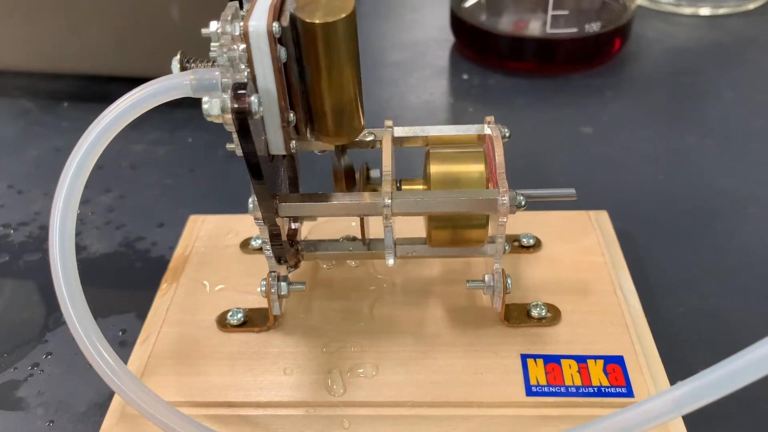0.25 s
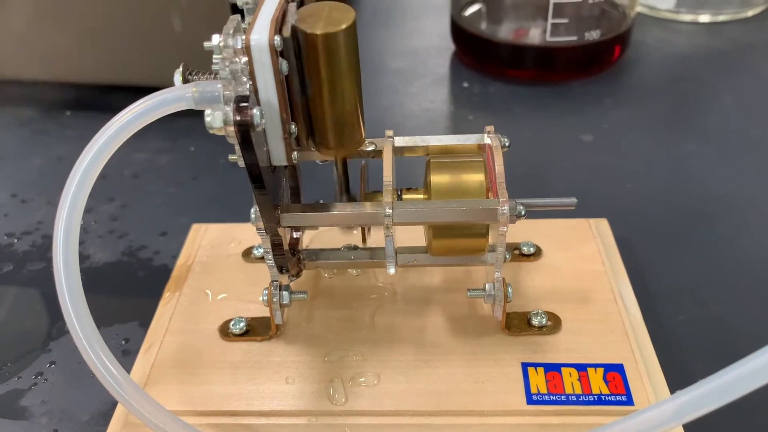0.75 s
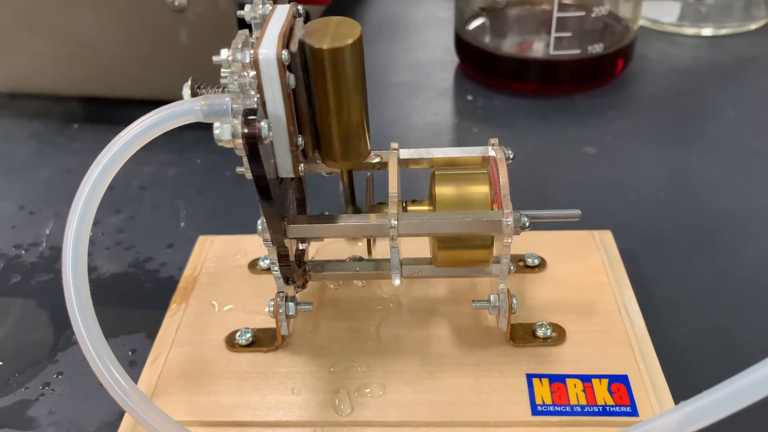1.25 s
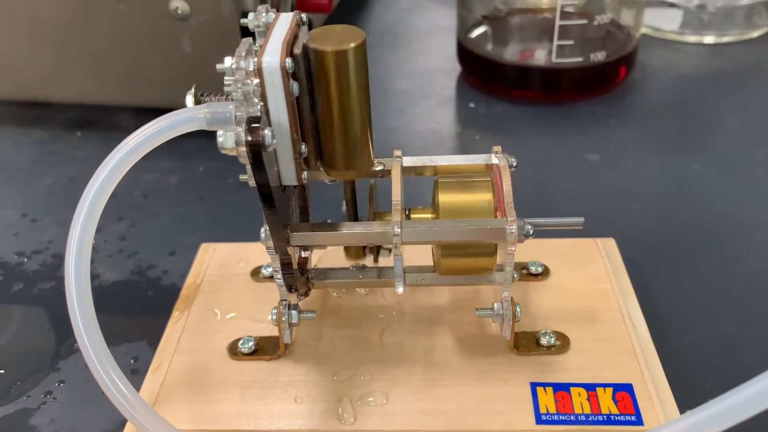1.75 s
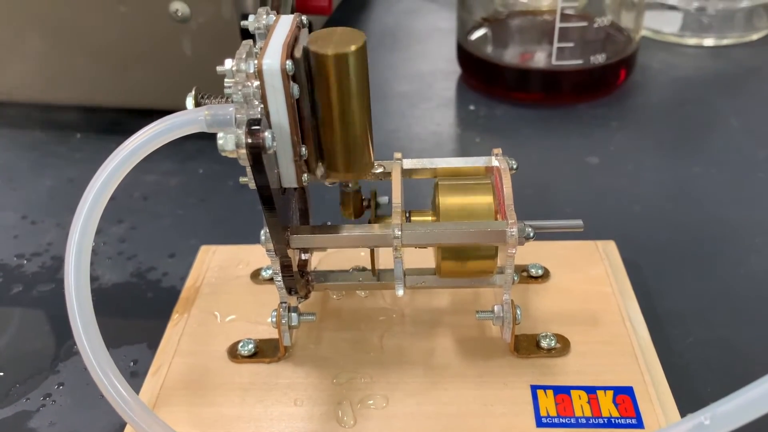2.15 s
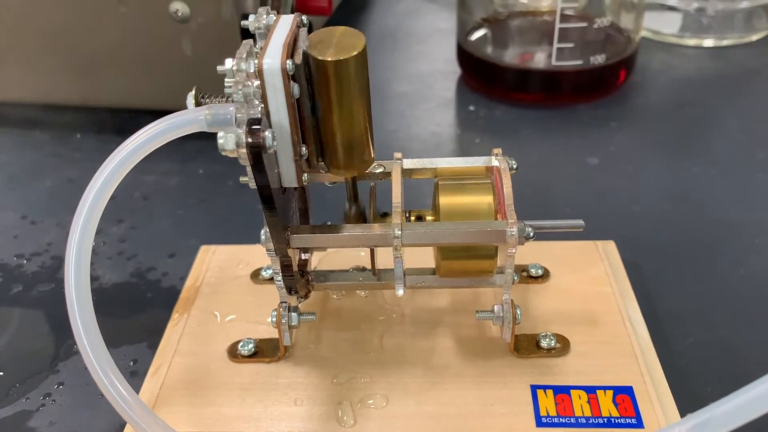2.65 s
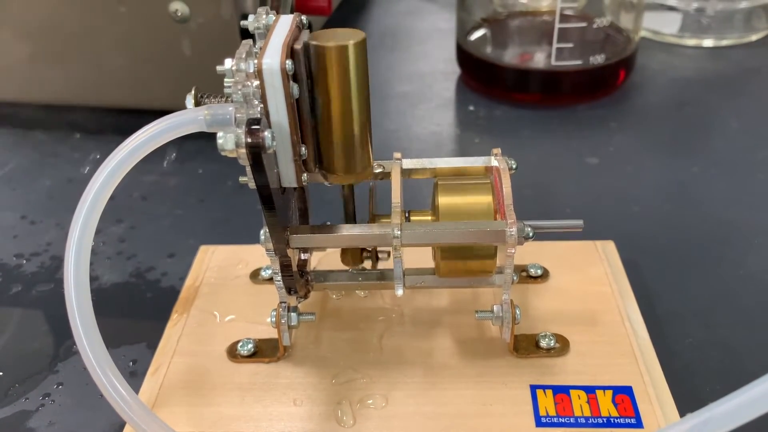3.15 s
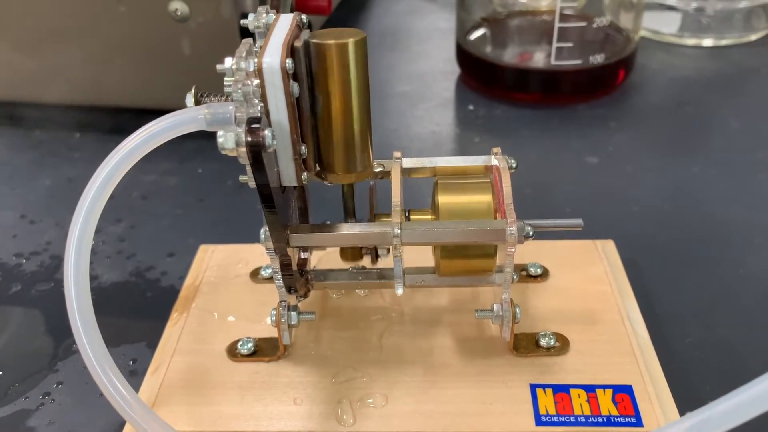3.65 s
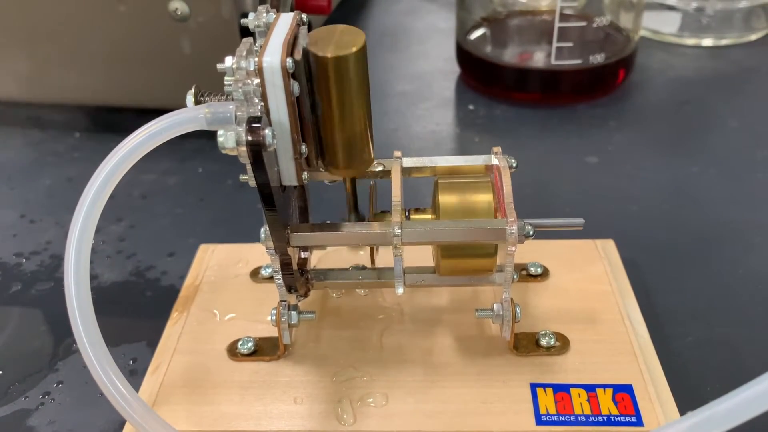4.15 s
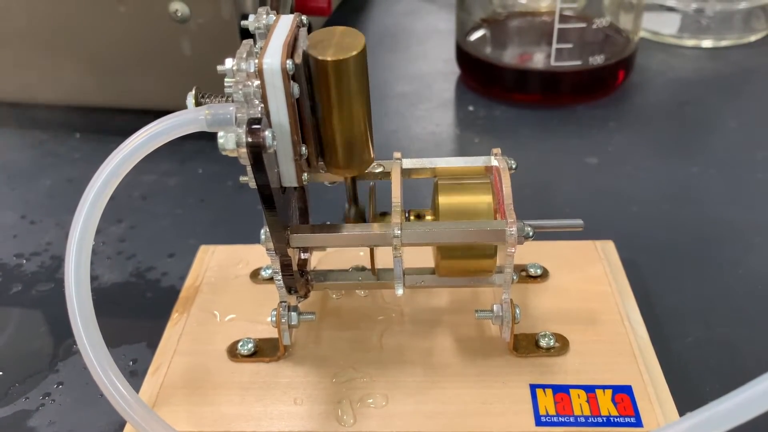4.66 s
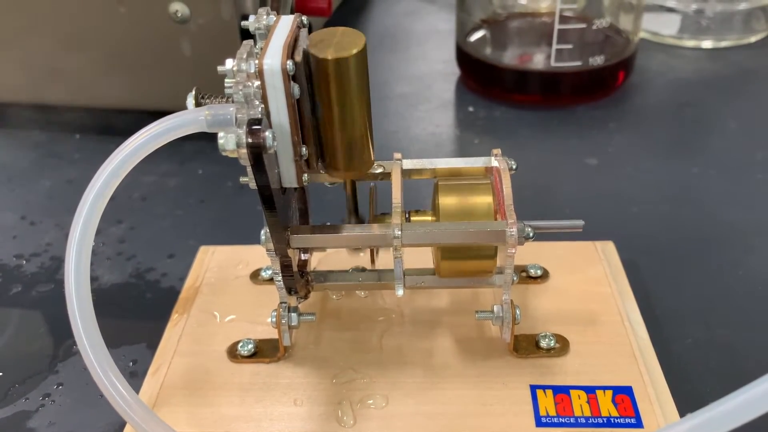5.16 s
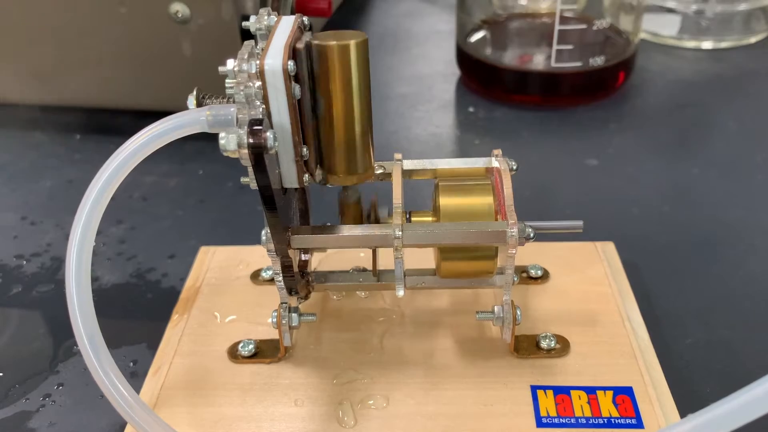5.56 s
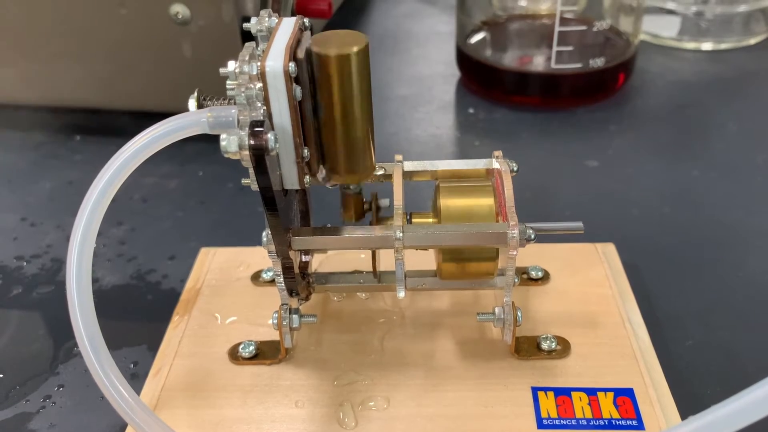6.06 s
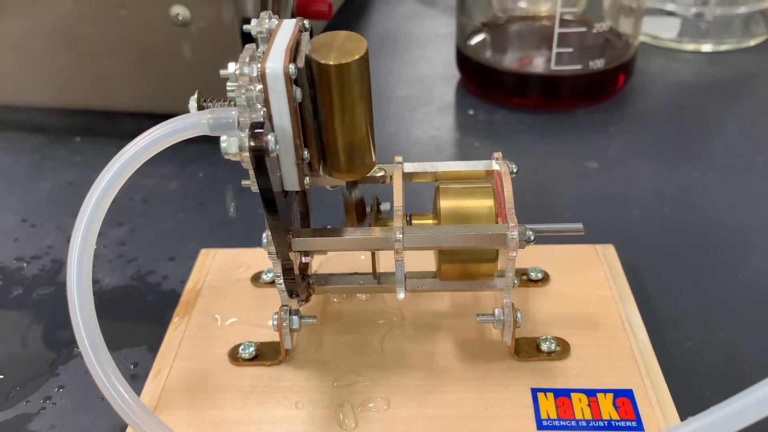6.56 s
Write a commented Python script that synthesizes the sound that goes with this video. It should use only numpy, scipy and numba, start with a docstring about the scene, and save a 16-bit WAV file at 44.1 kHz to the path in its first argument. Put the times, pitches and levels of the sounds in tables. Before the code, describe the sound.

Fast, even ticking and hollow clatter come from a miniature steam engine on a wooden board, heard up close in a small, hard-walled room. Short puffs of wet steam hiss and crackle with every stroke. The pace sags and recovers slightly, and the knocks grow harder and softer in spells. Behind it, a boiling flask settles to a quiet simmer within the first seconds.

```python
"""Small brass steam engine on a bench

The engine runs close by at about six turns a second. Twice a turn the crank hits the end of its slack:
a metal tick and a knock that rings the wooden board under it. The cylinder then rocks over, the piston
rubs, and wet steam hisses and spits from the port, its outlet. A flask boils behind, in a small hard room."""
import sys
import numpy as np
from scipy import signal
from scipy.fft import rfft, irfft
from scipy.io import wavfile
from numba import njit

SR = 44100
rng = np.random.default_rng(int(sys.argv[2]) if len(sys.argv) > 2 else 0)


def inscribe(sig):
    """Save sig as 16-bit PCM at rate SR to the path in sys.argv[1].

    A 1-D sig is mono; a 2-D sig holds one channel per row.
    Samples are clipped to [-1, 1] before scaling.
    """
    pcm = np.round(np.clip(np.atleast_2d(sig).T, -1, 1) * 32767)
    wavfile.write(sys.argv[1], SR, pcm.astype(np.int16))


N = 300762
TIME = np.arange(N) / SR
OUT, BACK = 0, 1  # the piston's two directions; paired stroke settings come in this order


def undb(db):
    """Turn decibels into a gain to multiply by."""
    return 10 ** (np.asarray(db) / 20)


def unit(response):
    """Scale a response to an energy of 1 per channel."""
    return response / np.sqrt(np.mean(np.sum(response ** 2, axis=-1)))


def curve(points, times=TIME):
    """Join a table's (time, value) points with straight lines."""
    return np.interp(times, *np.transpose(points))


def fade(t, t60):
    """Die away by 60 dB in t60 seconds."""
    return np.exp(-np.log(1000) * t / t60)


def through(x, response):
    """Let every sample of a sound set off a response, such as a ring or an echo."""
    return signal.fftconvolve(np.atleast_2d(x), np.atleast_2d(response), axes=1)[:, :N]


def filtered(x, order, hz, kind="lowpass"):
    """Keep the lows, the highs or a band; a higher order cuts more steeply."""
    return signal.lfilter(*signal.butter(order, hz, kind, fs=SR), x)


def colour(points, size=1024):
    """A short response with the tone colour of (frequency, level) points, fading below the first."""
    hz, db = np.transpose(points)
    bins_hz = np.fft.rfftfreq(size, 1 / SR)
    gain = undb(np.interp(np.log(bins_hz + 1), np.log(hz), db))
    gain *= np.minimum(bins_hz / hz[0] + 1e-2, 1) ** 2
    # move the energy to the start, so that clicks stay sharp
    cepstrum = irfft(np.log(gain))
    cepstrum[1:size // 2] *= 2
    cepstrum[size // 2 + 1:] = 0
    return unit(irfft(np.exp(rfft(cepstrum))))


@njit
def resonate(x, hz, width):
    """Ring at a pitch that can move; a smaller width (in Hz) rings longer."""
    y, state, decay = np.empty(len(x)), 0j, np.exp(-np.pi * width / SR)
    for i in range(len(x)):
        state = state * decay * np.exp(2j * np.pi * hz[i] / SR) + x[i]
        y[i] = state.imag
    return y * np.sqrt(2 * (1 - decay * decay))


def wander(per_s):
    """Drift to a new random value per_s times a second, with a spread of 1."""
    steps = rng.standard_normal(N)[:int(N / SR * per_s) + 2]
    x = np.interp(TIME * per_s, np.arange(len(steps)), steps)
    return x / x.std()


def grainy(per_s, grain_db):
    """Noise that comes in uneven grains; more grain_db makes it rougher."""
    x = rng.standard_normal(N) * undb(grain_db * np.minimum(wander(per_s), 2))
    return x / x.std()


def blows(times, db):
    """One sharp spike for each blow."""
    return np.bincount(np.clip(times * SR, 0, N - 1).astype(int), undb(db), N)


def swells(times, db, shape):
    """A loudness curve that repeats one shape at each of the times."""
    first_s, last_s = shape[0][0], shape[-1][0]
    swell = undb(curve(shape, np.arange(first_s, last_s, 1 / SR)))
    return through(blows(times + first_s, db), swell)[0]


def on_right(x, lag_s=.000298):
    """A sound on the right reaches the left ear a little later."""
    x = np.ravel(x)
    return np.array([np.pad(x, (int(lag_s * SR), 0))[:N], x])


def on_left(x):
    """A sound on the left reaches the right ear a little later."""
    return on_right(x)[::-1]


def room(dry, t60_s=0.13, echo_db=-13, dull_hz=3500, gap_s=0.01055):
    """Glassware and walls send back a short, duller wash of echoes."""
    t = TIME[:SR // 2]
    tail = rng.standard_normal((2, len(t))) * fade(t, t60_s) * (t > gap_s)
    return undb(echo_db) * through(dry, filtered(unit(tail), 1, dull_hz))


def near_echoes(x, echo_db=2.0, band_hz=(2000, 5600)):
    """Add the quick, bright echoes off frame, board and bench, different for each ear."""
    t = TIME[:SR // 30]
    echoes = unit(rng.standard_normal((2, len(t))) * fade(t, t60=.025))
    return x + undb(echo_db) * filtered(through(x, echoes), 2, band_hz, "bandpass")


# tone colour of the boiling water: (frequency [Hz], relative level [dB])
BOIL_COLOUR = [(90, 3.5), (300, 4), (1500, -7.5), (2200, -16.5), (3900, -10.5), (6000, -19), (8500, -36.5),
               (11700, -22), (13000, -15), (14600, -38)]
# how loudly it boils: (time [s], level [dB])
BOIL_LEVEL = [(0, -43), (.6, -47.5), (1.3, -52.5), (2.8, -55), (4.5, -55.5), (6.82, -53.5)]


def flask(width=0.67, centred_below_hz=50):
    """Water simmers behind the engine and settles in the first seconds."""
    middle, spread = (through(grainy(90, 4.7), colour(BOIL_COLOUR))[0] for _ in range(2))
    spread = width * filtered(spread, 1, centred_below_hz, "highpass")
    return np.array([middle + spread, middle - spread]) * undb(curve(BOIL_LEVEL))


# the leak comes and goes: (time [s], level [dB])
LEAK_LEVEL = [(3.9, -90), (4.15, -68), (4.9, -64), (5.15, -90)]
# its tone colour: (frequency [Hz], relative level [dB])
LEAK_COLOUR = [(5900, -12), (6500, -2), (8500, -14), (10500, -2), (11400, 3), (12500, -1), (15500, -3)]


def leak():
    """The valve leaks for a while with a thin, fluttering sizzle."""
    sizzle = grainy(70, 4) * undb(curve(LEAK_LEVEL))
    return on_right(through(sizzle, colour(LEAK_COLOUR)))


# tone colour of fine spray: (frequency [Hz], relative level [dB])
SPRAY_COLOUR = [(4400, -3), (6300, -5.5), (8000, 12), (9300, 14), (11000, -6), (14000, -5), (16000, -36)]
# puffs of spray: (time [s], level [dB])
SPRAYS = [(3.199, -43.5), (4.72, -54)]
# rise and fall of one puff: (time since its start [s], relative level [dB])
SPRAY_SHAPE = [(0, -3), (.005, -1.5), (.03, -0.5), (.045, -33)]


def spray(drops_per_s=5, drop_db=-36, spread_db=3, drop_t60_s=0.0057):
    """Droplets tick at random at the port, and now and then the steam blows out a spray."""
    when, size = rng.random((int(drops_per_s * N / SR), 2)).T
    drops_db = drop_db + spread_db * np.minimum(-np.log(size), 3)
    drops = through(blows(when * N / SR, drops_db), unit(fade(TIME[:SR // 30], drop_t60_s)))[0]
    mist = swells(*np.transpose(SPRAYS), SPRAY_SHAPE)
    return on_right(through((drops + mist) * grainy(630, 5.6), colour(SPRAY_COLOUR)))


# chirps of the piston: (time [s], middle pitch [Hz], level [dB])
CHIRPS = [(0.835, 3190.0, -48), (1.005, 4360, -51), (1.171, 3060, -52), (1.502, 3090, -46),
          (1.985, 3330, -49), (2.6, 3060, -52), (3.206, 4440, -38), (4.212, 3510.0, -58),
          (4.553, 3200, -46), (4.72, 3170, -53), (5.94, 4440, -41)]


def chirps(gain_db=-2, length_s=.016, rise_hz_per_s=14000, rough_hz=110):
    """The wet piston gives short, rough chirps that slide upwards."""
    t = np.arange(-length_s / 2, length_s / 2, 1 / SR)
    arch = np.sqrt(2) * np.cos(np.pi * t / length_s)
    sound, wobble_hz = np.zeros(N), rough_hz * wander(500)
    for middle_s, hz, db in CHIRPS:
        span = int((middle_s + t[0]) * SR) + np.arange(len(t))
        phase = 2 * np.pi * np.cumsum(hz + rise_hz_per_s * t + wobble_hz[span]) / SR
        sound[span] += undb(db + gain_db) * arch * np.sin(phase)
    return on_left(sound)


# notes of the wet exhaust passage: (pitch [Hz], width [Hz], relative level [dB])
PASSAGE_NOTES = [(2268, 48, -1.5), (2650, 1670, 10.5), (3220, 280, -12), (3484, 330, 2.5),
                 (4345, 120, -1.5)]


def passage(top_hz=4700):
    """The exhaust passage rings briefly and lets little treble through."""
    hz, width, db = np.transpose(PASSAGE_NOTES)[:, :, None]
    t = TIME[:SR // 40]
    notes = undb(db) * np.sqrt(width) * np.exp(-np.pi * width * t) * np.sin(2 * np.pi * hz * t)
    return unit(signal.sosfilt(signal.butter(6, top_hz, fs=SR, output="sos"), notes.sum(axis=0)))


# one sputter, a list for out and one for back: (time after the tick [s], relative level [dB])
SPUTTER_SHAPES = ([(.018, 9.5), (.028, 10), (.045, 8), (.068, -25)], [(.003, 11.5), (.02, 9), (.04, 0),
                  (.065, -35)])


def sputter(side, times, sputter_db, gain_db=-10, mist_db=-11, bursts_per_s=130, burst_db=3.5):
    """Condensed water crackles in the exhaust in uneven bursts and leaves the port as a fine mist."""
    crackle = grainy(500, 3.4) * swells(times, sputter_db + gain_db, SPUTTER_SHAPES[side])
    crackle *= undb(burst_db * wander(bursts_per_s))
    mist = undb(mist_db) * through(crackle, colour(SPRAY_COLOUR))
    return on_left(through(crackle, passage())) + on_right(mist)


# notes of the steam space: (start pitch [Hz], end pitch [Hz], width [Hz], relative level [dB])
SQUELCH_NOTES = [(2900, 3600, 170, -14), (4050, 4520, 100, -4.5)]
# rise and fall of one squelch: (time after the tick [s], relative level [dB])
SQUELCH_SHAPE = [(.02, -14), (.03, -2), (.044, 1.5), (.054, -7), (.064, -30)]


def squelch(times, sputter_db, start_s=0.02, slide_s=0.026, floor_db=-57, spread_db=2.5):
    """The steam space shrinks on the out stroke: its notes, rung by crackling water, slide up."""
    length_luck, pitch_luck, level_luck = rng.standard_normal((len(times), 3)).T
    stroke = np.maximum(np.searchsorted(times, TIME) - 1, 0)  # the latest stroke at each moment
    lengths_s = slide_s * np.exp(0.2 * length_luck)
    progress = np.clip((TIME - times[stroke] - start_s) / lengths_s[stroke], 0, 1)
    glide = np.sin(np.pi / 2 * progress)
    tuning = 1 + .025 * pitch_luck[stroke]
    squelch_db = np.maximum(sputter_db, floor_db) + spread_db * level_luck
    crackle = grainy(500, 3.4) * swells(times, squelch_db, SQUELCH_SHAPE)
    return on_left(sum(undb(db) * resonate(crackle, tuning * (start + (end - start) * glide), float(width))
                       for start, end, width, db in SQUELCH_NOTES))


# tone colour of the hiss: (frequency [Hz], relative level [dB])
STEAM_COLOUR = [(4500, -5.5), (6000, -17), (8000, 5.5), (9200, -6), (10500, 5), (11600, 0), (12100, 15),
                (13000, 17.5), (13800, 14.5), (14700, -28), (15150, 7), (15700, -5.5)]
# one hiss, a list for out and one for back: (time after the tick [s], relative level [dB])
STEAM_SHAPES = ([(.018, 1), (.022, 4.5), (.039, 4), (.05, -4.5), (.075, -29)], [(.014, 3.5), (.017, 7.5),
                (.028, -2.5), (.045, -12), (.065, -57)])


def steam(side, times, steam_db, gain_db=-5, whistle_db=-3, whistle_hz=13100, drift_hz=420):
    """The port opens and a thin jet hisses out, with a breathy whistle that wanders."""
    jet = grainy(700, 3.1) * swells(times, steam_db + gain_db, STEAM_SHAPES[side])
    whistle = resonate(jet, whistle_hz + drift_hz * wander(40), width=650.0)
    return on_right(through(jet, colour(STEAM_COLOUR)) + undb(whistle_db) * whistle)


# bursting water drops: (time [s], level [dB])
SPITS = [(1.823, -39), (2.6664, -31.5), (2.823, -36.5), (4.212, -34), (4.719, -35), (5.928, -42),
         (6.093, -34)]


def spits(gain_db=-2, t60_s=0.023):
    """Single drops burst, ringing the passage and hissing at the port."""
    times, db = np.transpose(SPITS)
    burst = through(blows(times, db + gain_db), fade(TIME[:SR // 20], t60_s)) * rng.standard_normal(N)
    return through(burst, passage()) + .5 * on_right(through(burst, colour(STEAM_COLOUR)))


# notes of the brass: (pitch [Hz], relative level going out [dB], relative level going back [dB])
BRASS_NOTES = [(3490, -27, -8), (4180, -44, 18.5), (4725, 39, -23), (5730, 18, 6.5)]


def brass(side, t60_s=0.028):
    """Crank and cylinder ring briefly, with a different mix of notes in each direction."""
    hz, out_db, back_db = np.transpose(BRASS_NOTES)[:, :, None]
    t = TIME[:SR // 20]
    notes = undb((out_db, back_db)[side]) * np.sin(2 * np.pi * hz * t)
    return unit(notes.sum(axis=0) * fade(t, t60_s))


# rise and fall of the metal's chatter: (time after the tick [s], relative level [dB])
CHATTER_SHAPE = [(-.002, -8), (-.001, 3), (.002, -1), (.006, -11.5), (0.02, -33)]
# tone colour of a tick: (frequency [Hz], relative level [dB])
TICK_COLOUR = [(1500, 2), (2500, -16.5), (3500, -21), (5200, -11.5), (6600, -22.5), (9000, -19),
               (10500, -11.5), (12000, -17.5), (13800, -11), (15500, -32.5)]


def ticks(side, times, tick_db, click_db=17, chatter_db=1, ring_db=-12, hard_db=-43):
    """Brass meets brass: rough chatter rings the metal, and harder hits have more of a clean click."""
    hardness_db = 0.64 * (tick_db - hard_db)
    click = blows(times - .0009, tick_db + click_db + hardness_db)
    contact = click + grainy(1100, 2.5) * swells(times, tick_db + chatter_db, CHATTER_SHAPE)
    ring = undb(ring_db) * through(contact, brass(side))
    return on_right(through(contact, colour(TICK_COLOUR))) + on_left(ring)


# stray clicks: (time [s], level [dB])
CLICKS = [(1.217, -52), (2.723, -32.5), (3.155, -40.5), (4.77, -42)]


def clicks(snap_db=22, tick_db=-9, snap_hz=(900, 2600)):
    """Loose brass parts click: a dry snap of the frame with a small metal tick."""
    times, db = np.transpose(CLICKS)
    snap = filtered(blows(times, db + snap_db), 2, snap_hz, "bandpass")
    return snap + ticks(OUT, times, db + tick_db)


# back strokes on which the cylinder rocks over hard: (time [s], relative level [dB])
JOLTS = [(0.138, -53), (.282, -40.5), (0.428, -54), (0.74, -43), (2.665, -45), (2.816, -37), (3.117, -39.5),
         (3.272, -36.5), (4.28, -45.5), (6.246, -36), (6.407, -43.5), (6.561, -48)]


def jolts(blow_db=27, thump_db=21, thump_hz=140, t60_s=0.066, early_s=0.0042):
    """The cylinder jolts: gives its blows, and the thumps of the whole board rocking on the bench."""
    times, db = np.transpose(JOLTS)
    t = TIME[:SR // 6]
    ring = np.sin(2 * np.pi * thump_hz * t) * fade(t, t60_s) * (1 - np.exp(-t * thump_hz))
    return blows(times, db + blow_db), through(blows(times - early_s, db + thump_db), unit(ring))


def bench_thuds(side, times, knock_db, rub_db, hz=104, t60_s=0.15, drag_db=3, gain_db=(-9, -5)):
    """Each stroke presses the board onto the bench, by its knock or its drag: a dull thud."""
    t = TIME[:SR // 6]
    push = blows(times, np.maximum(knock_db, rub_db + drag_db) + gain_db[side])
    return through(push, unit(np.sin(2 * np.pi * hz * t) * fade(t, t60_s)))


def hollow_frame(times, knock_db, gain_db=5, note_hz=385, width_hz=125.0, late_s=.001):
    """The out stroke knocks a short, hollow note from the frame, never quite at the same pitch."""
    hz = note_hz * (1 + .07 * wander(6))
    push = blows(times + late_s, knock_db + gain_db)
    return on_left(resonate(resonate(push, hz, width_hz), hz, width_hz))


# notes of frame and board: (pitch [Hz], relative level going out [dB],
# relative level going back [dB], head start at the left ear before limiting [radians])
BOARD_NOTES = [(147, -21.5, -8.5, 0.74), (209.6, -8.5, -10.5, -0.47), (236, -9.5, -1.5, 0.57),
               (283.5, -10, 0, 0.07), (365.3, -3.5, -1, 0.66), (423.6, -5, -2.5, 0.56),
               (460.2, -2, 1, 0.45), (479.7, -16, -1, 1.24), (604, -6, -3.5, 0.8), (677, -9, -9, 1.5),
               (726, -0.5, -2, 0.74), (790.4, -8.5, -3, 1.25), (885, -8.5, -3.5, 0.73), (960, -32, -3, 1.7),
               (1066, -3, -4, -2), (1225, -14.5, -4.5, -4), (1340, -6.5, -6.5, -1.5),
               (1480, -2.5, -1, 1.92), (1598, -8.5, -8, -0.94), (1956, -9.5, -11.5, -2),
               (2650, -10.5, -17, 1.35)]


def board(side, push, t60_at_500_hz=.054, spread_db=.7, groups=3):
    """Frame and board ring when pushed; low notes build up slowest and last longest."""
    hz, out_db, back_db, lead = np.transpose(BOARD_NOTES)[:, :, None]
    lead = np.clip(lead, -2.1, 2.1)
    t = TIME[:SR // 6]
    ring = fade(t, t60_at_500_hz * (hz / 500) ** -0.69) * (1 - np.exp(-t * hz))
    ring *= undb((out_db, back_db)[side]) / np.sqrt(np.sum(ring ** 2, axis=1, keepdims=True))
    ring[1::2] *= -1  # neighbouring notes swing against each other
    notes = np.array([ring * np.sin(2 * np.pi * hz * t + ear * lead) for ear in (.5, -.5)])
    notes /= np.sqrt(np.sum(notes.sum(axis=1) ** 2) / 2)
    # groups of notes drift in level, so each stroke sounds a little different
    return sum(through(push * undb(spread_db * wander(12)), notes[:, k::groups].sum(axis=1))
               for k in range(groups))


def rebounds(times, knock_db, gain_db=19, gap_s=0.0044, loss_db=3, low_cut_hz=800, count=2):
    """The crank bounces in its slack: quick, light blows that mainly ring the board's upper notes."""
    gaps_s = gap_s * (1 + 0.1634 * rng.standard_normal((len(times), count)))
    delays_s = np.cumsum(gaps_s, axis=1)
    hits = sum(blows(times + delays_s[:, k], knock_db + gain_db - k * loss_db) for k in range(count))
    return filtered(hits, 2, low_cut_hz, "highpass")


# rise and fall of one rub: (time after the tick [s], relative level [dB])
RUB_SHAPE = [(-.006, 2), (0, 7.5), (.012, 6.5), (0.025, 1), (0.038, -9), (0.064, -12.5)]


def piston_rub(times, rub_db, gain_db=-2, scrape_hz=(610, 744), scrape_db=-3):
    """The sliding piston pushes the board with grainy noise, strongest in one narrow band."""
    rubbing = grainy(500, 4.3) * swells(times, rub_db + gain_db, RUB_SHAPE)
    return rubbing + undb(scrape_db) * filtered(rubbing, 1, scrape_hz, "bandpass")


def cylinder_rock(side, times, rub_db, gain_db=19, delay_s=(0.011, 0.014), spread_s=0.00043):
    """The cylinder rocks over just after the knock and gives the board a second blow."""
    time_luck, level_luck = rng.standard_normal((len(times), 2)).T
    return blows(times + delay_s[side] + spread_s * time_luck, rub_db + gain_db + level_luck)


def knocks(side, times, knock_db, rub_db, gain_db=26.5, firm_db=-30, soft_hz=1100,
           soft_delay_s=0.004545, rub_delay_s=.005):
    """The crank knocks, the cylinder rocks and the piston rubs: together they push the board."""
    # a gentle knock lands later and duller; after a firm one the rub starts later
    gentleness = np.clip((firm_db - knock_db) / 10, 0, 1)
    crank = blows(times + soft_delay_s * gentleness, knock_db + gain_db)
    soft_part = crank * np.interp(TIME, times, gentleness)
    crank = crank - soft_part + filtered(soft_part, 1, soft_hz)
    rub_times = times + rub_delay_s * (1 - gentleness)
    return crank + cylinder_rock(side, times, rub_db) + piston_rub(rub_times, rub_db)


# speed of the flywheel: (time [s], speed [turns per second])
SPEED = [(0.0, 6.947), (0.255, 6.873), (0.914, 5.883), (1.811, 6.266), (2.25, 6.405), (2.335, 6.613),
         (3.096, 6.632), (3.638, 5.793), (4.65, 5.889), (4.734, 6.056), (5.362, 6.269), (5.67, 6.153),
         (6.246, 6.277), (6.82, 6.547)]


def stroke_times(side, first_s=.0452, back_turns=.534):
    """Moments when the piston turns round to go out or, about half a turn later, back."""
    turns = np.cumsum(curve(SPEED)) / SR
    turns -= np.interp(first_s, TIME, turns)
    return np.interp(np.arange(side * back_turns, turns[-1]), turns, TIME)


def accented(times, db, accents, within_s=.03):
    """A stroke close to a listed (time, level) takes that level instead of its own."""
    for accent_s, accent_db in accents:
        db = np.where(np.abs(times - accent_s) < within_s, accent_db, db)
    return db


# the out knock, firm when the engine labours and light when it runs freely: (time [s], level [dB])
OUT_KNOCK = [(0, -32), (.2, -33), (.64, -48), (.8, -28), (1.15, -29.5), (1.3, -38.5), (3.34, -39.5),
             (3.49, -30), (5.19, -29.5), (5.34, -42.5), (6, -34), (6.82, -41)]
# strokes on which the crank slams through its slack: (time [s], level [dB])
SLAMS = [(.42, -27.5), (.73, -30), (.89, -25), (1.06, -26), (1.23, -27), (1.4, -33.5), (1.47, -29.5),
         (1.56, -26.5), (1.72, -25.5), (1.95, -27.5), (2.04, -30), (2.19, -26.5), (2.35, -26), (2.5, -27),
         (2.65, -25), (3.11, -28), (3.26, -35), (3.93, -27.5), (4.27, -31), (4.61, -26.5), (4.78, -26),
         (5.11, -28.5), (5.27, -28), (5.5, -29), (5.59, -27), (5.83, -30.5), (6.23, -33), (6.7, -32.5)]
# the rub as the cylinder dries and wets: (time [s], relative level [dB])
FRICTION = [(0, -3.5), (1.5, -5), (2.8, -4), (4, -7.5), (5.3, -6.5), (6.1, -6), (6.82, -5.5)]
# the jet as the steam supply rises and falls: (time [s], relative level [dB])
STEAM_SUPPLY = [(0, -0.5), (.95, 4), (1.6, 0.5), (1.85, 3.5), (2.15, 1), (2.6, 2.5), (3.35, -1.5),
                (3.9, 3.5), (4.75, 3.5), (5.25, -1), (5.7, 1.5), (6.35, -2), (6.82, 1.5)]
# sputter of water in the exhaust, a list for out and one for back: (time [s], level [dB])
WETNESS = ([(0, -60), (.6, -50.5), (.95, -43), (1.3, -50), (1.9, -50.5), (2.4, -52), (2.9, -56.5),
           (3.35, -60), (3.85, -73), (4.6, -51.5), (5, -51.5), (5.35, -64), (6.3, -61), (6.82, -53)],
           [(0, -57), (1, -46), (1.4, -55.5), (2.7, -53.5), (3.3, -54), (5.7, -57), (6.08, -49.5),
           (6.3, -60)])
# strokes that carry a gulp of water and squelch loudly: (time [s], level [dB])
WET_STROKES = [(.81, -45), (2.58, -47), (3.18, -53.5), (4.01, -49), (4.18, -49.5)]


def strokes(side, back_knock_db=-62, light_db=-37, firm_db=-29, valve_tick_db=-47.5):
    """Each stroke's time and its levels of knock, rub, tick, steam and sputter, before their gains."""
    times = stroke_times(side)
    spreads_db = [.8, .7, 2, (1.7, 3)[side], 1.3]  # no two strokes are quite alike
    luck_db = rng.standard_normal((len(times), 5)) * spreads_db
    knock_luck, rub_luck, tick_luck, steam_luck, sputter_luck = luck_db.T
    knock_db = accented(times, (curve(OUT_KNOCK, times), back_knock_db)[side] + knock_luck, SLAMS)
    firmness = np.clip((knock_db - light_db) / (firm_db - light_db), 0, 1)
    # the piston rubs less after a firm knock
    rub_db = (-39.5, -37.5)[side] + curve(FRICTION, times) - (10.5, 2)[side] * firmness + rub_luck
    # the tick follows the knock, but the valve's own light tick is always there
    tick_db = np.maximum(knock_db - (11, 12)[side], valve_tick_db) + tick_luck
    steam_db = (-47.5, -51.5)[side] + curve(STEAM_SUPPLY, times) + steam_luck
    # a firm knock shakes more water into the exhaust
    sputter_db = curve(WETNESS[side], times) + (0.5, 1)[side] * firmness + sputter_luck
    return times, knock_db, rub_db, tick_db, steam_db, accented(times, sputter_db, WET_STROKES)


def scene(left_louder_db=1.0, out_push_db=-2.0):
    """The engine's out and back strokes take turns, with the room and the flask behind."""
    jolt_blows, thumps = jolts()
    body = thumps + clicks() + chirps()
    treble = spits() + spray()
    for side in (OUT, BACK):
        times, knock_db, rub_db, tick_db, steam_db, sputter_db = strokes(side)
        push = knocks(side, times, knock_db, rub_db) + rebounds(times, knock_db)
        treble += ticks(side, times, tick_db)
        treble += steam(side, times, steam_db) + sputter(side, times, sputter_db)
        if side == OUT:
            treble += squelch(times, sputter_db)
            body += hollow_frame(times, knock_db)
            push *= undb(out_push_db)
        else:
            push += jolt_blows
        body += board(side, push) + bench_thuds(side, times, knock_db, rub_db)
    engine = body * undb([[left_louder_db / 2], [-left_louder_db / 2]]) + near_echoes(treble)
    return engine + room(engine) + flask()


def record(dry, top_hz=15700):
    """Cut away the very highest treble."""
    return signal.sosfilt(signal.ellip(8, .2, 70, top_hz, fs=SR, output="sos"), dry)


dry = scene()
out = record(dry)
inscribe(out)
```